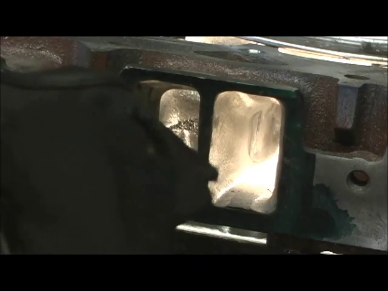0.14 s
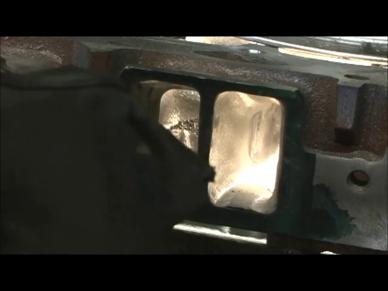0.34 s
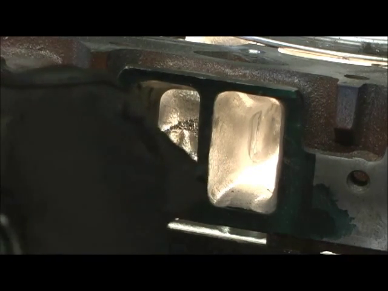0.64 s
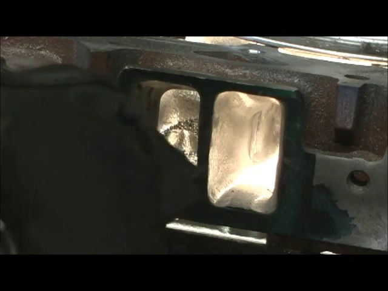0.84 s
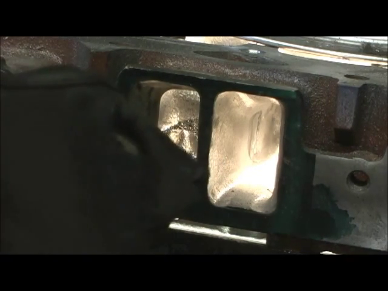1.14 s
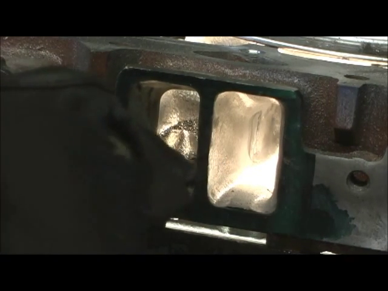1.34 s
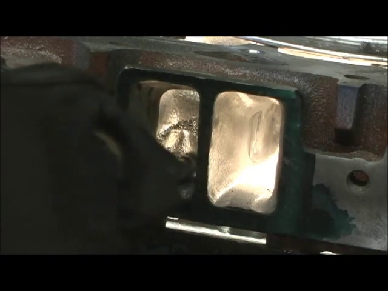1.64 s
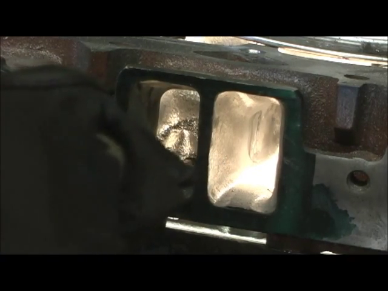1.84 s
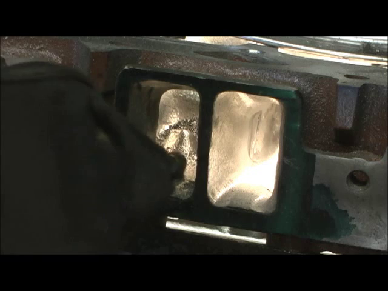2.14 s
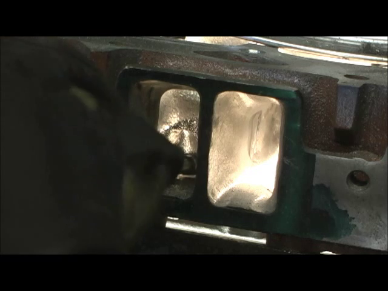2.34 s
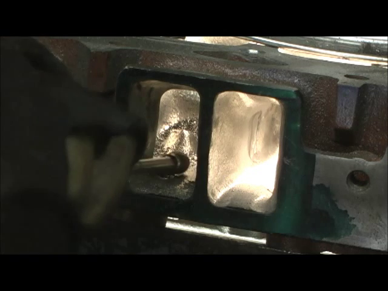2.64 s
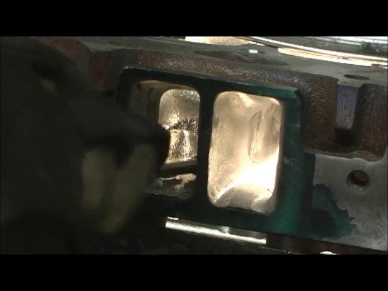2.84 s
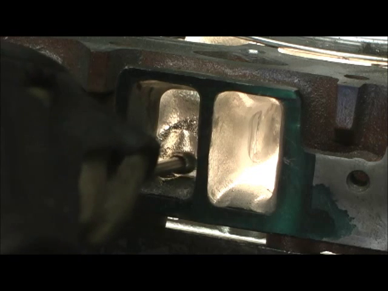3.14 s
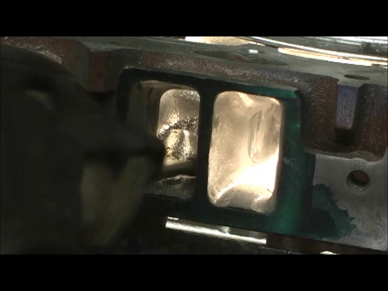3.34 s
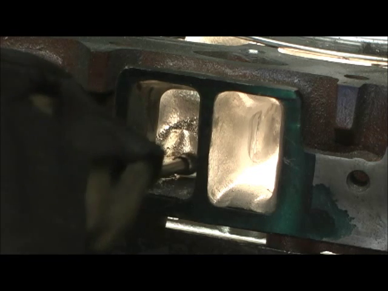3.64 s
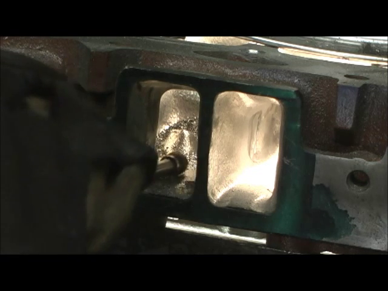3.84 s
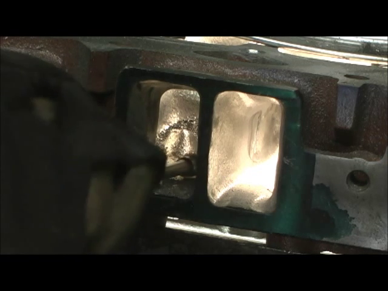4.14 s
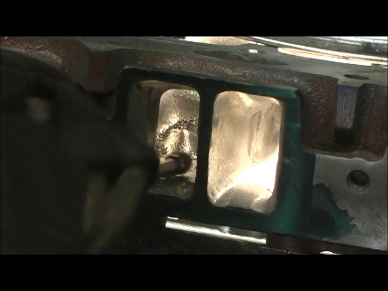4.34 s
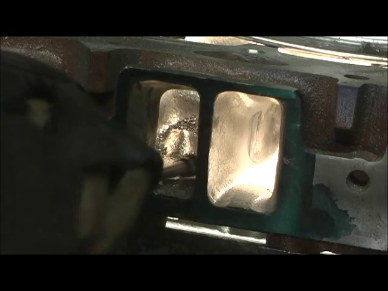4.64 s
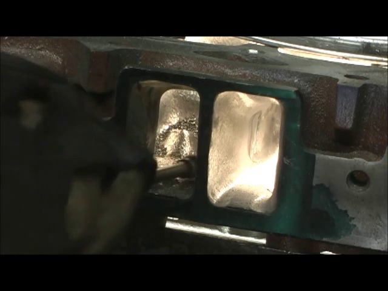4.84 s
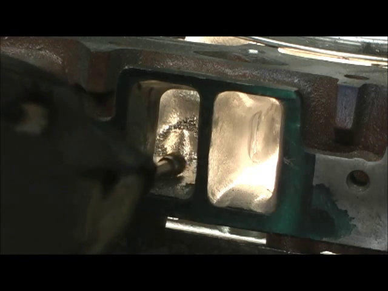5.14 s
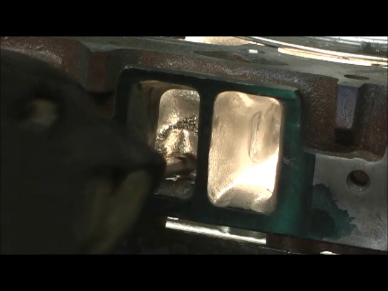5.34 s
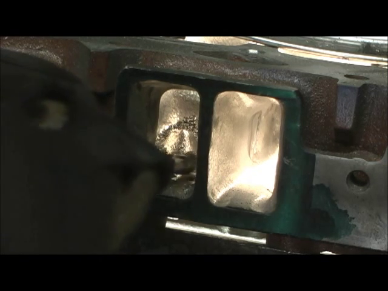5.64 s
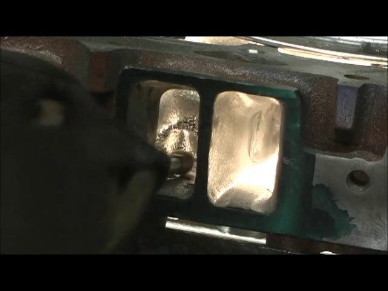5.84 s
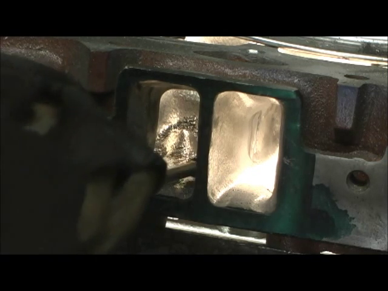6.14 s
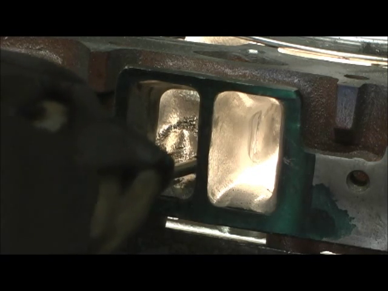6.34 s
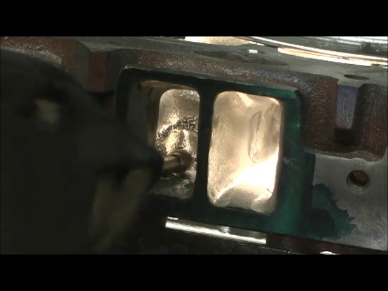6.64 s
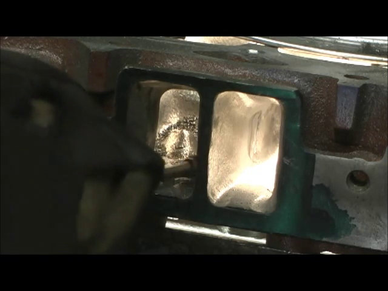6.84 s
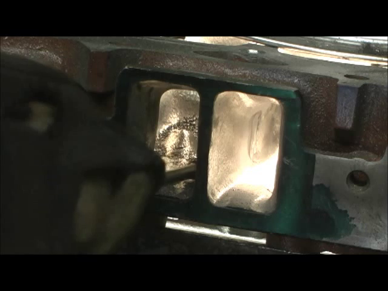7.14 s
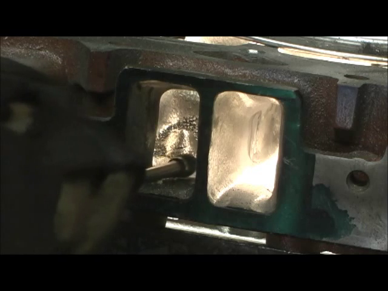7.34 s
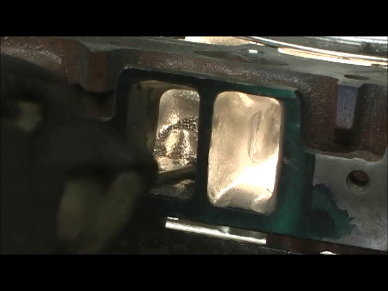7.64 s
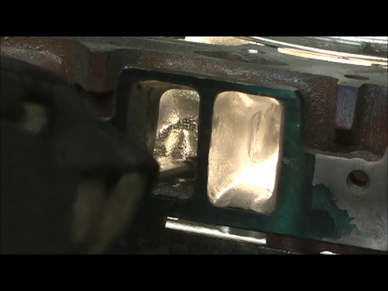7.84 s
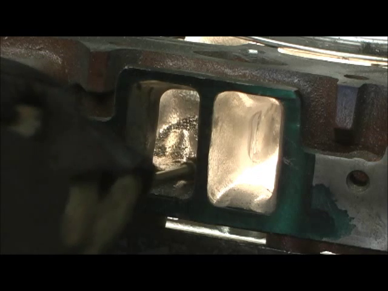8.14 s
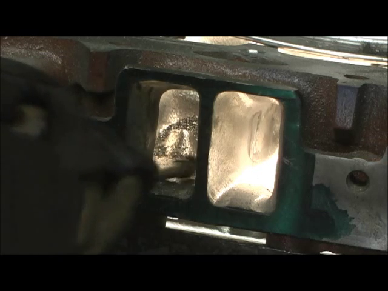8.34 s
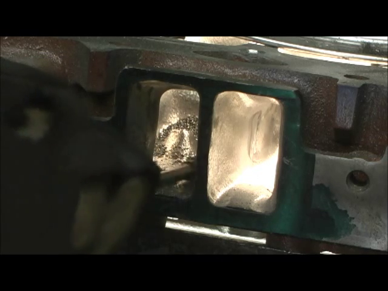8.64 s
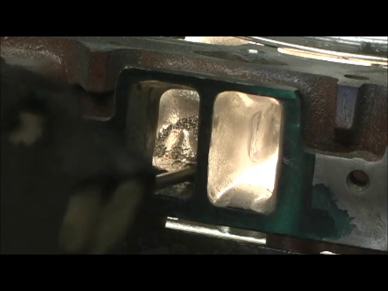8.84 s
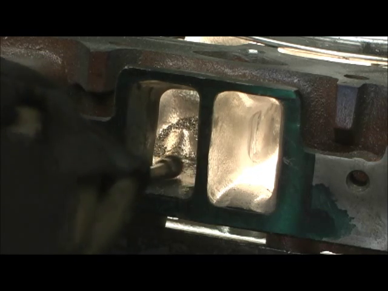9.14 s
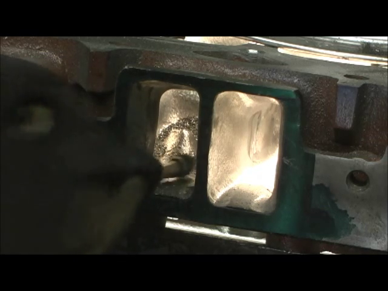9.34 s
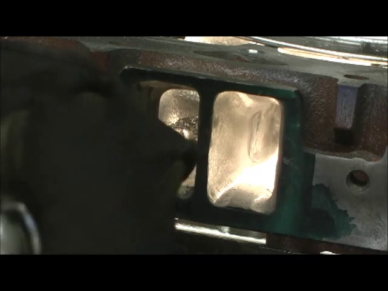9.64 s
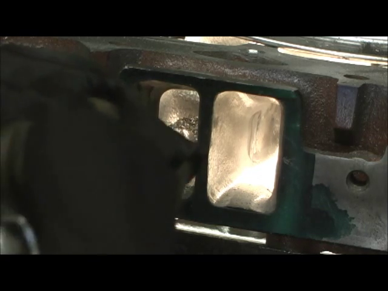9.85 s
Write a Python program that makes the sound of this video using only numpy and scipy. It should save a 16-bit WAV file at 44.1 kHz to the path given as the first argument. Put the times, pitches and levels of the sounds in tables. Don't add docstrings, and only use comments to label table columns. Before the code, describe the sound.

Constant rough air hiss and coarse metal scraping, heard very close. A pneumatic motor's whine starts fairly prominent, rises briefly, then becomes fainter and dips repeatedly as the long burr presses into the hollow casting. The iron sings sharply, with faint low rumbles from the bench. The treble shifts as the tool swings. In the last half second it lifts free, leaving whine and hiss with less ringing.

```python
import sys
import numpy as np
from scipy import signal
from scipy.fft import rfft, irfft
from scipy.io import wavfile
from scipy.ndimage import uniform_filter1d

SR = 44100
rng = np.random.default_rng(int(sys.argv[2]) if len(sys.argv) > 2 else 0)


def materialize(psi):
    bounded = np.clip(np.atleast_2d(psi).T, -1, 1)
    quanta = np.round(bounded * 32767).astype(np.int16)
    wavfile.write(sys.argv[1], SR, quanta)


def ratio(d):
    e = np.asarray(d, float) / 20
    return 10 ** e


N = 441000
T = np.arange(N) / SR
HZ = np.maximum(np.fft.rfftfreq(N, 1 / SR), 1)
COARSE = T[::100]


def rms_one(x):
    return x / np.sqrt(np.mean(x ** 2) + 1e-20)


def in_time(rows):
    s, *columns = np.transpose(rows)
    return [np.interp(T, s, c) for c in columns]


def at_hz(rows, column=1):
    rows = np.array(rows)
    return np.interp(np.log(HZ), np.log(rows[:, 0]), rows[:, column])


def drift(rate_hz):
    r = np.exp(-80 * np.pi * rate_hz / SR)
    noise = rng.standard_normal(N // 40 + 2002)
    slow = signal.lfilter([1], [1, -2 * r, r * r], noise)[2000:]
    return np.interp(np.arange(N) / 40, np.arange(len(slow)), rms_one(slow))


def shaped(spectrum, gain):
    return rms_one(irfft(spectrum * gain, N))


def modes(table):
    total = 0
    for hz, width_hz, db in table:
        total = total + ratio(db) / np.sqrt(width_hz) / (1 + 2j * (HZ - hz) / width_hz)
    return total / (1 + (330 / HZ) ** 8)


def held(times, start, length, rise, fall, levels):
    return np.interp(times - start, [0, rise, length, length + fall], levels)


# (time [s], gloved hand over the port [0-1], jet aim toward the listener [dB])
POSTURE = [(0.0, 1, -3), (0.8, 0.97, -3.5), (1.6, .6, -4), (2.3, .9, -3.5), (2.6, 0.11, -3.5),
           (3.4, 0.25, -4.5), (4.3, 0.01, -3), (5.2, 0.08, -4.5), (5.9, .15, -3.5), (6.35, .2, -0.5),
           (7.0, 0.32, -0.3), (7.55, 0.02, -5.5), (8.3, 0, -3.5), (9.3, 0.01, -5), (9.5, .4, 1.5),
           (9.67, .8, -1), (9.8, 0.72, 3), (10.0, 0.75, -1)]


def posture():
    return in_time(POSTURE)


# (time [s], vane rate [Hz], whine level [dB])
LIGHT_TOUCH = [(0.06, 1460, -32.0), (0.16, 1484, -33.5), (0.45, 1469, -30), (1.04, 1483, -32.5),
               (1.44, 1452, -30), (1.86, 1505.0, -33.5), (2.19, 1604, -30.5), (2.6, 1529, -33.5),
               (2.86, 1584, -35.5), (3.36, 1572, -39), (3.97, 1535, -36.5), (4.47, 1546, -36.5),
               (5.52, 1521, -42.0), (6.51, 1553, -43.5), (6.84, 1510.0, -41), (7.54, 1482, -39),
               (9.37, 1442, -39), (9.56, 1562, -35.5)]
# (time [s], hold [s], sag [Hz], whine gain [dB])
BITES = [(0.163, 0.021, 61.0, 0.3), (0.554, 0.1, 40.6, -2), (1.01, 0.034, 76.1, 1.5),
         (1.217, 0.005, 55.6, -4), (1.43, 0.048, 104.1, 0.3), (1.58, 0.095, 88.07, 2),
         (1.835, 0.095, 39.24, 4), (2.321, 0.04, 46.0, -8), (2.945, 0.14, 163.2, 5),
         (3.446, 0.215, 190.0, 3.5), (4.063, 0.19, 180, 5), (4.622, 0.031, 147.0, 6.5),
         (4.87, 0.015, 128.0, 12), (5.093, 0.015, 50.5, 3.5), (5.312, 0.029, 74.0, 7),
         (5.53, 0.055, 73.2, -1), (5.743, 0.055, 122, 4), (6.0, 0.038, 138.5, 0), (6.16, 0.09, 130.0, 9),
         (6.588, 0.0054, 76.0, 3.8), (7.16, 0.24, 130.2, 6), (7.7, 0.26, 110.4, 4),
         (7.941, 0.065, 156.0, 8), (8.211, 0.046, 128.3, 9), (8.463, 0.005, 82.0, 5),
         (8.638, 0.068, 100.0, 5.0), (8.86, 0.072, 122.0, 8), (9.052, 0.05, 95.2, 7),
         (9.195, 0.07, 30.1, 4)]


def speed_and_load():
    bog_s, recover_s, inertia_s = .075, .13, .04
    full_sag_hz, free_hz = 220, 1590
    light_hz, whine_db = in_time(LIGHT_TOUCH)
    shapes = [held(COARSE, s, bog_s + hold, bog_s, recover_s, [0, 1, .83, 0]) for s, hold, _, _ in BITES]
    bites = np.array(BITES)
    sag_hz = np.interp(T, COARSE, np.max(bites[:, [2]] * shapes, axis=0))
    gain_db = np.interp(T, COARSE, np.max(bites[:, [3]] * shapes, axis=0))
    sag_hz = uniform_filter1d(sag_hz, size=int(inertia_s * SR))
    load = (free_hz - light_hz + sag_hz) / full_sag_hz
    return light_hz - sag_hz, whine_db + gain_db, load


# (multiple of the turn rate [1], level over the hum [dB])
SHAFT_ORDERS = [(3, 0), (4, -1)]
# (frequency [Hz], width [Hz], level [dB])
HUM_MODES = [(285, 18.3, 1.1), (322.3, 14, 7)]


def motor():
    clear_db, flutter_per_db, waver_per_db = -34, .7, .0008
    glide_db, glide_hz_per_s = -7, 1000
    hum_db, hum_wander_db = -56.5, 1.5
    vane_hz, whine_db, _ = speed_and_load()
    uncovered = 1 - np.clip(posture()[0] * 2, 0, 1)
    glide = uncovered * np.tanh((np.gradient(vane_hz) * SR / glide_hz_per_s) ** 2)
    faint_db = np.maximum(clear_db - in_time(LIGHT_TOUCH)[1], 0)
    vane_hz = vane_hz * (1 + waver_per_db * faint_db * drift(4.24))
    dropout = np.maximum(drift(7.9) - .5, 0)
    whine_db = whine_db - flutter_per_db * faint_db * dropout + glide_db * glide
    turn = 2 * np.pi * np.cumsum(vane_hz * (1 + 0.001015 * drift(23.8))) / SR / 5
    shaft = np.sin(turn)
    for k, db in SHAFT_ORDERS:
        shaft = shaft + ratio(db + 2 * drift(4.7)) * np.sin(k * turn)
    hum = sum(ratio(db) / (1 + ((vane_hz / 5 - hz) * 2 / width_hz) ** 2) for hz, width_hz, db in HUM_MODES)
    whine = ratio(whine_db + 0.4 * drift(24)) * np.sin(5 * turn)
    return np.sqrt(2) * (whine + ratio(hum_db + hum_wander_db * drift(1.7)) * hum * shaft)


MONO_FLOOR_HZ = 5600
# (time [s], half length [s], both hear alike up to [Hz])
SWINGS = [(2.099, 0.083, 10970), (2.599, 0.065, 10400), (2.892, 0.032, 10330), (3.418, 0.047, 10800),
          (3.758, 0.11, 6760), (4.048, 0.026, 10130), (4.45, 0.033, 9100), (4.842, 0.045, 10230),
          (5.139, 0.032, 10400), (5.417, 0.059, 10660), (5.83, 0.063, 8010), (6.142, 0.095, 10930),
          (6.54, 0.1, 10120), (6.93, 0.044, 9700), (7.238, 0.068, 10260), (7.618, 0.062, 10460),
          (8.113, 0.049, 11100), (8.462, 0.041, 8830), (8.798, 0.074, 10130), (9.128, 0.049, 7540),
          (9.375, 0.031, 9330), (9.676, 0.08, 10200), (9.946, 0.036, 9000)]


def swing_hz(times):
    return sum((top_hz * 1.14 - MONO_FLOOR_HZ) / (1 + ((times - at) / half) ** 6)
               for at, half, top_hz in SWINGS)


# (frequency [Hz], level per Hz [dB])
JET_COLOUR = [(3000, -90), (5500, -12.5), (6300, -7.5), (6700, -6.5), (7300, 1), (7700, 1.5), (8600, 1),
              (9700, 1.5), (10700, -1.5), (11800, -3), (12900, 0), (13800, -4.5), (15000, -5), (16200, -16)]


def exhaust():
    cover, aim_db = posture()
    core_db = -23.5 - 0.22 * aim_db - 1.57 * cover
    swing = np.interp(T, COARSE, swing_hz(COARSE)) / MONO_FLOOR_HZ
    edge_db = aim_db - 1 * swing
    top_db = -9 + 5 * cover
    air = rfft(rng.standard_normal((2, N)) * ratio(.5 * drift(6.4) + 0.51 * drift(68)))
    above_core = 1 / (1 + (9300 / HZ) ** 24)
    above_edge = 1 / (1 + (12100 / HZ) ** 24)
    parts = [(1 - above_core, 0), (above_core - above_edge, edge_db), (above_edge, top_db)]
    jet = 0
    for part, part_db in parts:
        level = ratio(core_db + part_db + .5 * drift(15))
        jet = jet + level * shaped(air, ratio(at_hz(JET_COLOUR)) * part)
    return jet


def chips(pressure_db, spread_db):
    sizes = ratio(spread_db * rng.standard_normal(N) + pressure_db)
    return rfft(sizes * rng.standard_normal((2, N)))


# (frequency [Hz], level per Hz [dB])
SCOUR_COLOUR = [(1500, -90), (2900, -27), (3200, 1), (3900, 0), (4500, -1), (5300, -3), (6200, -3.5),
                (7000, -7.5), (12000, -90)]
# (frequency [Hz], level per Hz [dB])
HOLLOW_COLOUR = [(150, -30.5), (250, -20.5), (290, -22), (332, -18), (432, -8.5), (593, -10.5), (831, -7),
                 (1180, -3.5), (1560, 0.5), (1810, 2), (2100, -0.5), (2410, -0.5), (2620, -9.5),
                 (3000, 0.5), (3100, -14.5), (4030, -56), (6820, -120)]
# (frequency [Hz], width [Hz], level [dB])
CROSS_MODES = [(2560, 60, -5), (2616, 32, 0), (2674, 28, -2), (2770, 100, -2)]
# (frequency [Hz], width [Hz], level [dB])
LOUD_RING = [(3172, 11, 0), (3211, 18, -6)]
# (frequency [Hz], width [Hz], level [dB])
CASTING = [(398, 12, -21), (437, 16, -19), (838, 25, -13), (1050, 22, -12), (1262, 30, -10), (1540, 32, 0),
           (2082, 22, -7), (2140, 26, -4), (3380, 35, -7), (3921, 40, -5.5), (4836, 25, -8), (5095, 45, -5),
           (6718, 35, -6)]
# (time [s], length [s], share lifted [0-1])
LIFTS = [
    (-.1, .3, 0.3),
    (2.08, .2, 0.55),
    (9.46, .7, 0.99),
]


def burr():
    vane_hz, _, load = speed_and_load()
    cover = posture()[0]
    lifted = sum(share * held(T, s, length, .06, .06, [0, 1, 1, 0]) for s, length, share in LIFTS)

    def layer_db(level_db, load_db, cover_db, lift_db, wander_db):
        return level_db + load_db * load + cover_db * cover + lift_db * lifted + wander_db * drift(2.9)

    scour_db = layer_db(-29.5, 0.7, -2.5, 2.5, 0.6)
    hollow_db = layer_db(-32, 1.5, -0.4, 0, 0.1)
    cross_db = layer_db(-32.5, -0.5, 4.5, -3, 0.8)
    ring_db = layer_db(-35.5, 4, -4, -14, .5)
    throb_db = 1.5 * np.cos(2 * np.pi * np.cumsum(vane_hz / 5) / SR)
    bounce_db = .5 * drift(14) + 0.82 * drift(41) + throb_db

    contact = chips(pressure_db=0.6 * bounce_db, spread_db=4)
    skid_db = 2.5 * np.exp(-((T - 9.39) / 0.058) ** 2)
    scour = ratio(scour_db + 1.4 + skid_db) * shaped(contact, ratio(at_hz(SCOUR_COLOUR)))
    hollow = ratio(hollow_db + 3) * shaped(contact, ratio(at_hz(HOLLOW_COLOUR)))
    cross = ratio(cross_db - 3.0) * shaped(contact, modes(CROSS_MODES))

    struck = chips(pressure_db=1.0 * bounce_db, spread_db=3)
    ring = shaped(struck, modes(LOUD_RING))
    ring = rms_one(ring / (0.42 + uniform_filter1d(np.abs(ring), size=4000)) ** 0.85)
    glove_damps_db = -4.5 * cover
    casting = ratio(scour_db - 3.5 + glove_damps_db) * shaped(struck, modes(CASTING))
    return scour + hollow + ratio(ring_db + 2.0) * ring + casting + cross


# (frequency [Hz], level per Hz [dB])
BENCH_COLOUR = [(30, -27), (62, -37), (78, -11), (95, 6.5), (106, -4), (130, 6), (145, -6), (165, 1),
                (200, -3.5), (225, 7), (258, -19), (286, 0), (330, -17), (400, -39)]
# (time [s], length [s], level [dB])
LEANS = [
    (2.329, 0.58, 10.5),
    (3.9, 0.28, 6),
    (4.299, .5, 7),
    (4.922, .5, 6),
    (6.998, .3, 3),
    (7.5, 0.49, 8),
    (8.1, .15, 1),
    (8.504, 0.94, 3.5),
]


def bench():
    lean_db = sum(db * held(T, s, length, .05, .25, [0.038, 1, 0.61, 0.075]) for s, length, db in LEANS)
    shaking = rfft(rng.standard_normal((2, N)))
    rumble = ratio(-61 + lean_db) * shaped(shaking, ratio(at_hz(BENCH_COLOUR)))
    ring = shaped(shaking, modes([(286.3, 6, 0.1)]) / (1 + (HZ / 330) ** 12))
    return rumble + ratio(-63) * ring


def nearby_surfaces(sound, level_db, t60):
    sparse = (rng.standard_normal((2, 1, N)) * (rng.random((2, 1, N)) < .02))
    echoes = sparse * ratio(-60 * T / t60) * (T > .002)
    echoes = echoes / np.sqrt(np.sum(echoes ** 2) / 2)
    treble_only = 1 + (4000 / HZ) ** 4
    first, second = irfft(rfft(sound) * rfft(echoes) / treble_only, N)
    angle = 1.27 * drift(0.33)
    return sound + ratio(level_db) * (np.cos(angle) * first + np.sin(angle) * second)


# (frequency [Hz], likeness [0-1], left lead [rad], left over right [dB])
MIC_PORTS = [(200, 1, 0.95, 4.5), (2900, 0.91, 0.52, -7), (5850, 0.65, 0.03, -4.5), (6630, 0.67, -0.24, 0),
             (7600, 0.95, 0.62, -2.2), (9350, 0.79, 0.5, -0.5), (10400, 0.15, 1, -5),
             (11100, 0.74, 1.02, 4.5), (12500, 0.8, 2, 2), (13200, .63, 1.8, 6), (14100, .59, 0, 7),
             (15600, .3, 2.5, 7)]


def scene():
    noisy = nearby_surfaces(exhaust() + burr(), level_db=-9.5, t60=0.066)
    direct, scattered = rfft(noisy + bench() + motor() * [[1], [0]])
    alike, lead, tilt_db = (at_hz(MIC_PORTS, column=k) for k in (1, 2, 3))
    alike = np.clip(alike, 0, 1)
    right = (alike * direct + np.sqrt(1 - alike ** 2) * scattered) * np.exp(-1j * lead)
    return irfft([direct * ratio(tilt_db / 2), right * ratio(-tilt_db / 2)], N)


def low_pass(x):
    return signal.sosfilt(signal.butter(12, 16040, fs=SR, output="sos"), x)


def record(dry):
    notch_step_hz, cutoff_hz = 600, 15735
    off_hz = (HZ + notch_step_hz / 2) % notch_step_hz - notch_step_hz / 2
    dips = ratio(-6 * np.exp(-(off_hz / 20) ** 2) * (HZ > notch_step_hz / 2))
    bass_cut = np.sqrt(1 + (60 / HZ) ** 6)
    top_cut = 1 + (HZ / cutoff_hz) ** 900
    left, right = irfft(rfft(dry) * dips / bass_cut / top_cut, N)
    hz, s, (mid, side) = signal.stft([(left + right) / 2, (left - right) / 2], SR, nperseg=1024)
    hz_down = hz[:, None]
    rise_hz = swing_hz(s)
    luck = rng.standard_normal((65, len(s) // 4 + 1))
    luck = np.repeat(np.repeat(luck, 8, axis=0), 4, axis=1)[:len(hz), :len(s)]
    margin_hz = hz_down + 0.47 * luck * (rise_hz + 300) - MONO_FLOOR_HZ - rise_hz
    above_edge = 1 / (1 + np.exp(np.clip(-margin_hz / 60, -30, 30)))
    stray = luck > 1.7 + .7 * (np.abs(hz_down - 1800) < 900)
    kept = np.maximum(above_edge, stray)
    mid = mid * ratio(4.2 * rise_hz / MONO_FLOOR_HZ * np.exp(-((hz_down - 11000) / 1500) ** 2))
    top = 1 - (hz_down > 15300 + 250 * np.abs(luck[1])) * (luck[0] > .9)
    mid, side = signal.istft(top * [mid, side * kept], SR, nperseg=1024)[1][:, :N]
    return low_pass(np.array([mid + side, mid - side]))


dry = scene()
out = record(dry)
materialize(out)
```